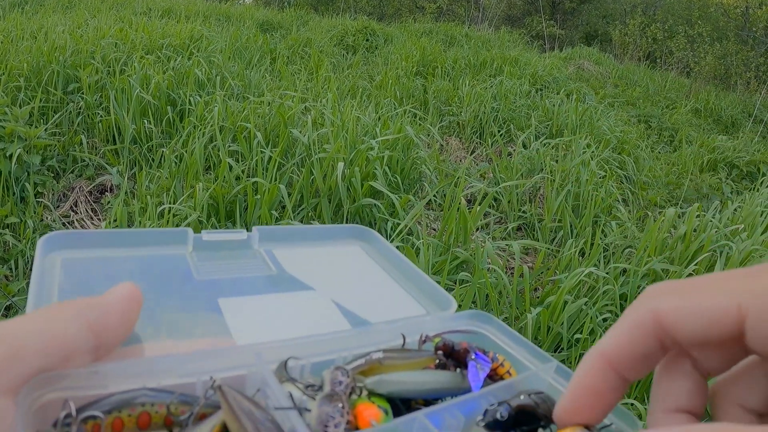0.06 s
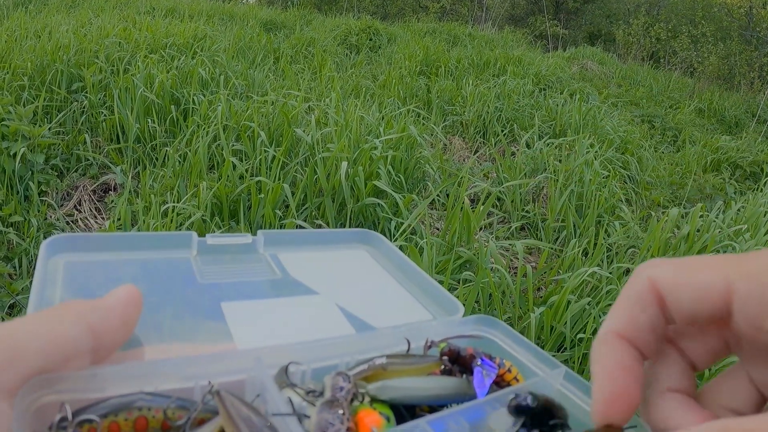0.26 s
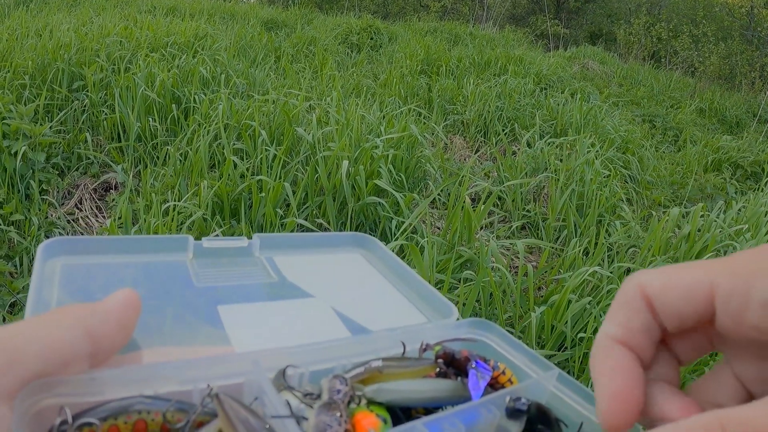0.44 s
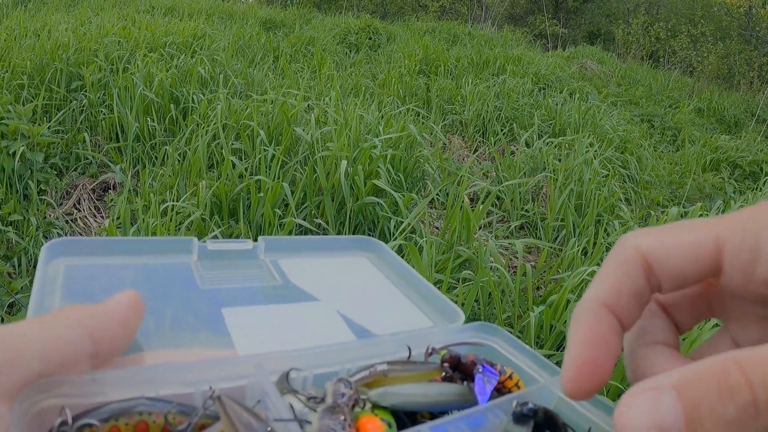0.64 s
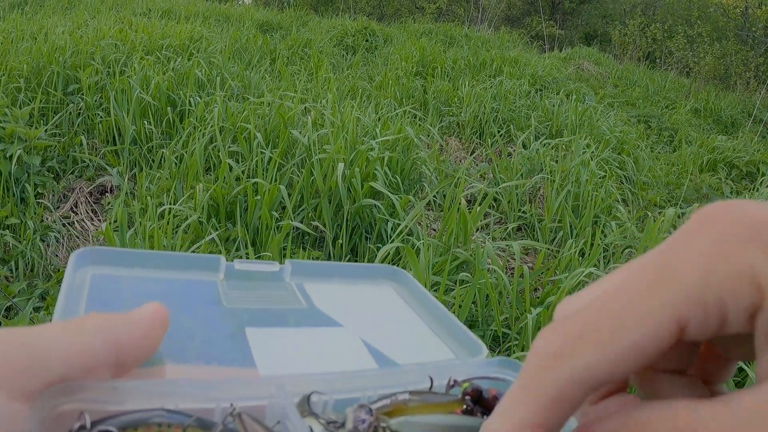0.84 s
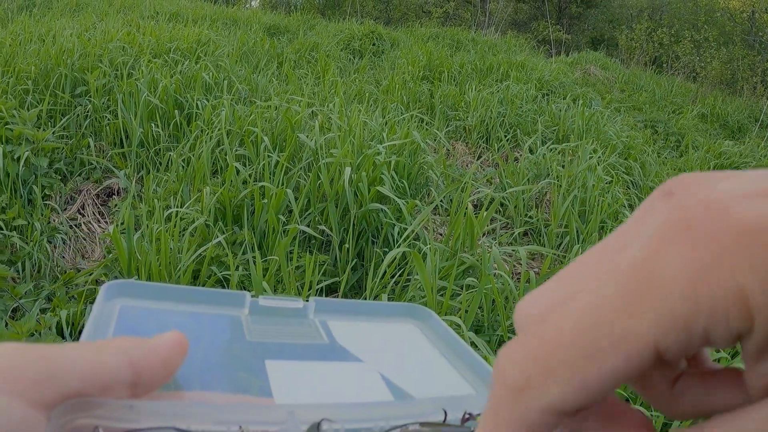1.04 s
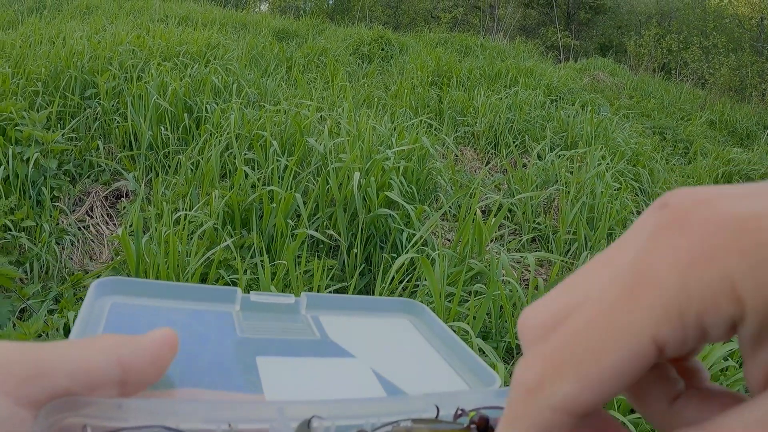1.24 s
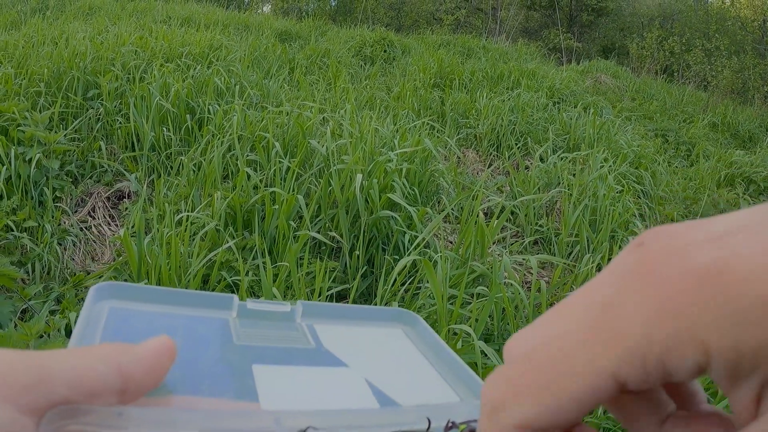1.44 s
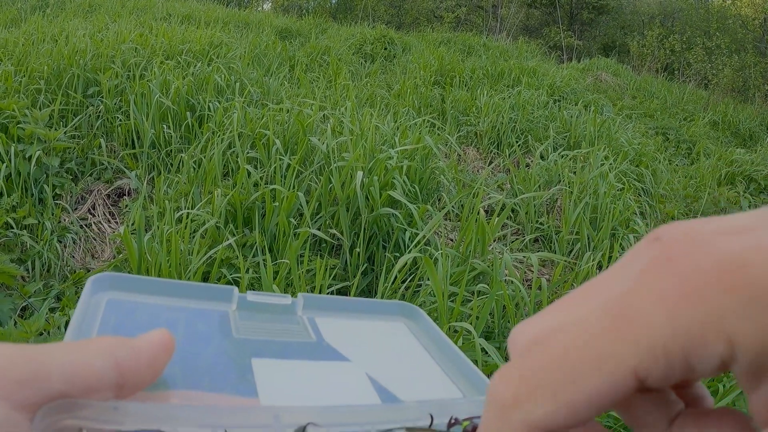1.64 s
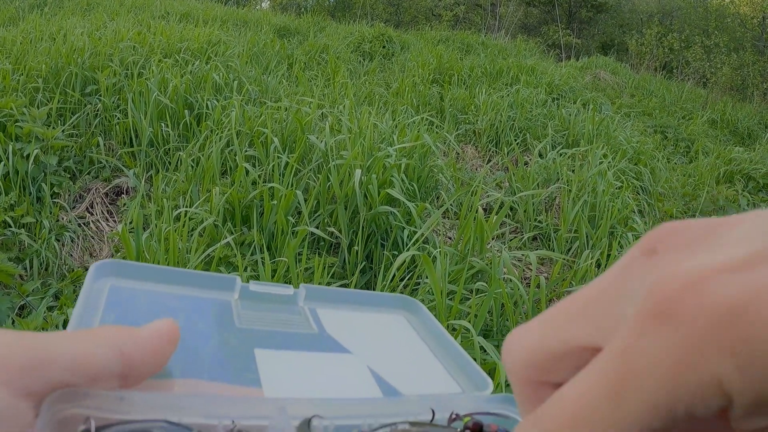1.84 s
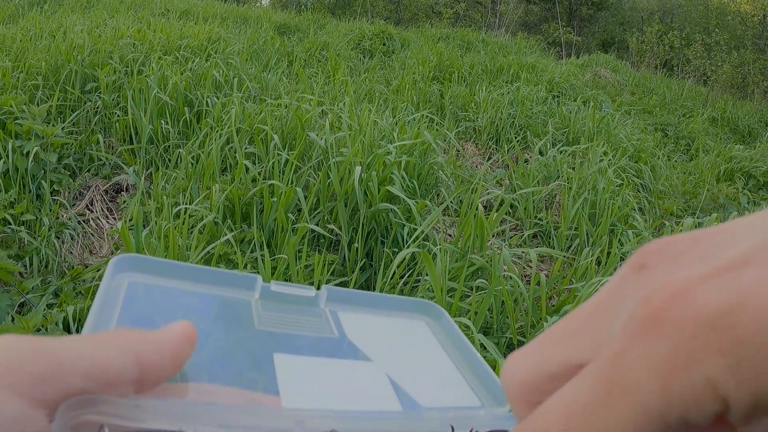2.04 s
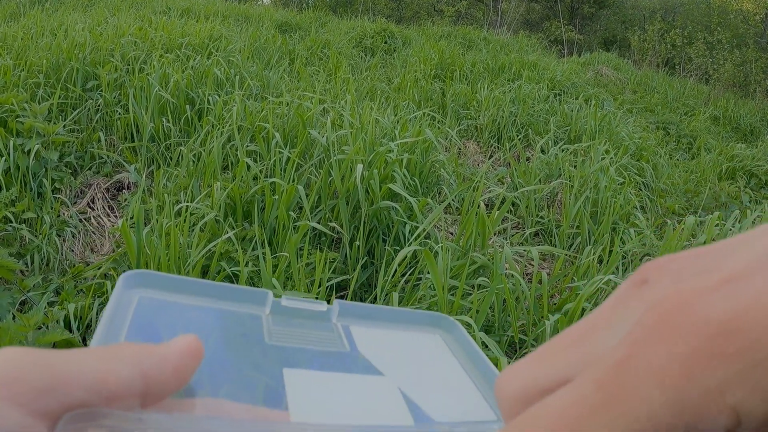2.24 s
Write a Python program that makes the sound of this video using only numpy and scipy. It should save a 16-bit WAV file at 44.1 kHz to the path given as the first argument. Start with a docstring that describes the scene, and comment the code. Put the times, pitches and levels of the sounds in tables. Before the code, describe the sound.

Hard plastic lures and small metal hooks rattle and click in a box stirred by hand

```python
"""Stirred tackle box in a meadow

Fingers stir hard lures and hooks in a plastic box close by: sharp clicks over a rattle of small ones.
Contacts are noise scrapes rung through resonances; sliding, thuds and rubbing are filtered noise.
Far birds are gliding tones; an insect-like buzz is gated noise; wind bumps are low sine bursts;
a faint outdoor hush is coloured noise."""
import sys
import numpy as np
from scipy import signal
from scipy.fft import rfft, irfft
from scipy.io import wavfile
from scipy.ndimage import map_coordinates

SR = 44100
rng = np.random.default_rng(int(sys.argv[2]) if len(sys.argv) > 2 else 0)


def master(y):
    """Save y as 16-bit WAV."""
    cut = np.clip(np.atleast_2d(y).T, -1, 1)
    pcm = np.round(cut * 32767)  # scale
    wavfile.write(sys.argv[1], SR, pcm.astype(np.int16))


def how_loud(loudness_db):
    """Turn decibels into a plain amplitude multiplier (0 dB gives 1, 20 dB gives 10)."""
    steps = np.asarray(loudness_db, float) / 20
    return 10 ** steps


N = 99225
T = np.arange(N) / SR

# How hard the fingers stir. Each row: time in seconds, rattle level in dB.
STIR_CURVE = [(0.0, -45.5), (0.066, -63), (0.078, -34.5), (0.108, -31), (0.122, -56.5), (0.2, -50.5),
              (0.257, -33.5), (0.309, -59.5), (0.39, -32.5), (0.416, -46), (0.434, -30.5), (0.509, -21.5),
              (0.552, -56.5), (0.915, -99), (0.935, -47.5), (1.063, -47), (1.183, -26), (1.213, -37),
              (1.235, -49), (1.28, -49), (1.306, -58), (1.403, -28), (1.425, -39.5), (1.474, -38.5),
              (1.51, -50.5), (1.613, -28), (1.64, -59.5), (1.66, -34), (1.707, -45), (1.732, -25.5),
              (1.839, -43), (1.9, -27), (1.935, -36), (1.963, -27), (1.992, -45.5), (2.022, -33),
              (2.05, -59), (2.105, -35.5), (2.176, -52), (2.25, -35.5)]
# Resonances of box and lures: middle, treble, hollow.
# Each row: centre in Hz, width in Hz, relative level in dB of one pass.
RING_MODES = [(2350, 357, 9.5), (3500, 1360, 0.5)]
TREBLE_MODES = [(5120, 1450, 11.5), (7990, 2860, 1), (11120, 7600, -2.5)]
HOLLOW_MODES = [(870, 700, -1), (1655, 870, 18.5)]
HOLLOW_DB, COLOUR_SPREAD_DB = -9, 5.5


def unit(x):
    """Rows brought to rms 1."""
    return x / np.sqrt(np.mean(x ** 2, -1, keepdims=True) + 1e-20)


def resonances(modes, hz, scatter_db=np.zeros(4)):
    """Causal response of summed second-order resonances of alternating sign, levels shifted by scatter_db."""
    total = 0
    for k, (centre_hz, width_hz, db) in enumerate(modes):
        damping = 1j * hz * width_hz
        response = damping / (centre_hz * centre_hz - hz * hz + damping)
        total = total + (-1) ** k * how_loud(db + scatter_db[k]) * response
    return total


def window(start_s, length_s):
    """A soft-edged gate."""
    return np.sin(np.pi * np.clip((T - start_s) / length_s, 0, 1)) ** .5


def shaped(gain, channels):
    """Noise of rms 1 coloured by gain(Hz)."""
    hz = np.fft.rfftfreq(N, 1 / SR) + 1
    return unit(irfft(rfft(rng.standard_normal((channels, N))) * gain(hz), N))


def drift(points_per_s):
    """Smooth random curve through normal points at a steady rate."""
    return map_coordinates(rng.standard_normal(N // 100), [T * points_per_s])


def smear(x, t60_s):
    """Decaying-noise reverberation, two channels of about the energy of x."""
    tail = rng.standard_normal((2, SR // 8)) * how_loud(-60 * T[:SR // 8] / t60_s)
    return signal.fftconvolve(x[None], tail / np.linalg.norm(tail[0]), axes=1)[:, :N]


def lean_right(pair):
    """Right channel raised 3 dB against the left."""
    return pair * how_loud([[-1.5], [1.5]])


def stir_db(s):
    """Stirring level at the times s, linear in dB between points."""
    return np.interp(s, *np.transpose(STIR_CURVE))


def strikes(rows, size=1024):
    """Each contact is a short scrape ringing three parts of the box in its own colour; mid and side."""
    contact_s, contact_spread, detune = .0005, .3, .03  # spreads are of the natural log
    s, peak_db, treble_db = np.transpose(rows)[:, :, None]
    luck = rng.standard_normal((len(rows), 2 * size + 7))
    u = np.arange(size) / SR / (contact_s * np.exp(contact_spread * luck[:, :1]))
    noise = luck[:, 7:].reshape(-1, 2, size).swapaxes(0, 1)
    spectrum = rfft(noise * u * np.exp(-u))
    hz = (np.fft.rfftfreq(size, 1 / SR) + 1) * np.exp(detune * luck[:, 1:2])
    colour_db = COLOUR_SPREAD_DB * np.tanh(luck[:, 2:7].T[:, :, None])

    def part(modes, scatter_db):
        """The scrape passed twice through one set of resonances, at rms 1."""
        return unit(irfft(spectrum * resonances(modes, hz, scatter_db) ** 2, size))

    ring = part(RING_MODES, colour_db[3:] / 2)
    treble = how_loud(treble_db) * part(TREBLE_MODES, colour_db)
    hollow = how_loud(HOLLOW_DB + colour_db[-1]) * part(HOLLOW_MODES, colour_db[2:])
    sound = ring + treble + hollow
    sound = sound * how_loud(peak_db) / np.abs(sound).max(-1, keepdims=True)
    at = (np.round(s * SR).astype(int) + np.arange(size)).ravel()
    return np.array([np.bincount(at, c.ravel(), N + size)[:N] for c in sound])


def clicks():
    """Plastic lure bodies knock the box, steel hooks and rings tick with more treble; mid and side."""
    knock_treble_db, tick_treble_db = -14.5, -5  # over the ring
    # Lure bodies on the box. Each row: start in seconds, peak in dB.
    knocks = [(0.0727, -25.5), (0.097, -24.5), (0.1781, -31), (0.2173, -18.5), (0.248, -21.5),
              (0.2598, -12), (0.29, -34), (0.393, -28), (0.44, -20), (0.4446, -15), (0.4635, -12),
              (0.4751, -15), (0.4812, -12), (0.4871, -13), (0.4947, -12.5), (0.5076, -22), (0.9305, -32.5),
              (1.034, -27.5), (1.077, -23), (1.0871, -28), (1.1356, -46), (1.1574, -20), (1.179, -12.5),
              (1.204, -25), (1.3476, -26.5), (1.3634, -19.5), (1.3818, -29), (1.405, -24), (1.411, -22.5),
              (1.4345, -20), (1.471, -27), (1.498, -30), (1.56, -20.5), (1.5728, -8), (1.577, -21.5),
              (1.6084, -19), (1.615, -25), (1.634, -31.5), (1.6494, -35), (1.663, -13.5), (1.7196, -15.5),
              (1.7261, -11.5), (1.761, -28), (1.8066, -21.5), (1.8835, -12.5), (1.9183, -16),
              (1.9561, -9.5), (2.1962, -32), (2.2459, -25)]
    # Hooks and rings. Each row: start in seconds, peak in dB.
    ticks = [(0.3842, -21.5), (0.4237, -11.5), (0.427, -11.5), (0.4377, -9), (0.4999, -8.5), (0.5154, -17),
             (0.538, -27), (0.9732, -27), (1.117, -47), (1.1887, -20.5), (1.393, -13.5), (1.3958, -12.5),
             (1.4758, -20.5), (1.6581, -12), (1.6902, -12.5), (1.7372, -18.5), (1.742, -15), (1.7462, -13),
             (1.7977, -21.5), (1.8935, -8.5), (1.899, -11.5), (1.9021, -12), (1.9693, -18.5),
             (2.0933, -26.5), (2.1155, -23.5), (2.2139, -28.5), (2.2346, -26)]
    rows = [(*row, knock_treble_db) for row in knocks]
    rows += [(*row, tick_treble_db) for row in ticks]
    return strikes(rows)


def rattle(count=1000):
    """Small contacts at random times, sized by the stirring, more of them faint than strong; mid and side."""
    size_range_db, treble_db = 16, -11
    s, size, colour = rng.uniform(size=(count, 3)).T
    s = s * N / SR
    peak_db = stir_db(s) + size_range_db * (size ** 2 - .5)
    return strikes(np.transpose([s, peak_db, treble_db + 3 * COLOUR_SPREAD_DB * (colour - .5)]))


def scrape():
    """Lures sliding on plastic: flickering noise in the same resonances; mid and side."""
    below_rattle_db, treble_db, flicker_db, flicker_per_s = -14, -3, 7, 180
    low = shaped(lambda hz: resonances(RING_MODES, hz) ** 2
                 + how_loud(HOLLOW_DB) * resonances(HOLLOW_MODES, hz), channels=2)
    high = shaped(lambda hz: resonances(TREBLE_MODES, hz), channels=2)
    low = low * how_loud(flicker_db * drift(flicker_per_s))
    high = high * how_loud(treble_db + flicker_db * drift(flicker_per_s / 2))
    return how_loud(stir_db(T) + below_rattle_db) * (low + high)


def thuds():
    """Box knocked on the lap and rubbed by hands: noise through the resonances of its body."""
    t60_s = .08
    rub_db, rub_follows = -35, 0.69  # level at 0 dB stirring, dB per dB of stirring
    # Knocks on the lap. Each row: start in seconds, initial level in dB.
    lap_knocks = [(0.436, -46), (0.499, -31.5), (1.393, -48), (1.726, -47.5), (1.914, -44.5)]
    # The whole box. Each row: centre in Hz, width in Hz, relative level in dB of one pass.
    body_modes = [(163, 103, 2.5), (353, 705, -1.5)]
    knocking = sum(how_loud(db - 60 * np.maximum(T - s, 0) / t60_s) * (T > s) for s, db in lap_knocks)
    rub = how_loud(rub_db + rub_follows * stir_db(T))
    return (knocking + rub) * shaped(lambda hz: resonances(body_modes, hz) ** 2, channels=1)


def box():
    """All box sounds, a little to the right; lid and body throw a short echo, treble is wider in stereo."""
    apart_db, echo_db, echo_t60_s = -12, -16, .05
    mid, side = clicks() + rattle() + scrape()
    side = np.diff(side, prepend=0)  # tilts the difference to the treble
    spread = how_loud(apart_db) * np.array([side, -side])
    return lean_right(mid + thuds() + spread + how_loud(echo_db) * smear(mid, echo_t60_s))


def birds():
    """Unsteady gliding whistles, a warble and a repeated high chip, blurred by the bushes."""
    flutter_db, waver_share, blur_t60_s = 3, .012, .07
    warble_s, warble_length_s, warble_db = .818, .052, -54
    warble_hz, warble_swing_hz, warble_per_s = 3350, 450, 72
    chip_s, chip_every_s, chip_length_s, chip_hz, chip_db = .664, .188, .012, 6620, -66
    # Whistles. Each row: start in seconds, length in seconds, first Hz, last Hz, level in dB.
    notes = [(0.055, 0.036, 2524, 2463, -48), (0.646, 0.027, 2640, 3500, -58),
             (0.691, 0.047, 3450, 2060, -70.5), (.868, 0.0072, 3240, 3750, -49),
             (0.875, 0.081, 3666, 3560, -55), (0.928, 0.125, 3430, 3150, -57)]
    waver = 1 + waver_share * drift(40)
    flutter = how_loud(flutter_db * drift(70))

    def tone(hz):
        """Sine following hz, with the shared waver and flutter."""
        return flutter * np.sqrt(2) * np.sin(2 * np.pi * np.cumsum(hz * waver) / SR)

    song = sum(how_loud(db) * window(s, d) * tone(np.interp(T, [s, s + d], [first_hz, last_hz]))
               for s, d, first_hz, last_hz, db in notes)
    swing = np.sin(2 * np.pi * warble_per_s * (T - warble_s))
    warble = (1 - np.abs(swing) / 2) * tone(warble_hz + warble_swing_hz * swing)
    song = song + how_loud(warble_db) * window(warble_s, warble_length_s) * warble
    chips = sum(window(chip_s + k * chip_every_s, chip_length_s) for k in range(3))
    song = song + how_loud(chip_db) * chips * tone(np.full(N, chip_hz))
    return (song + smear(song, blur_t60_s)) / np.sqrt(2)


def buzz():
    """A band of rasping noise switched on and off at a steady pace."""
    peak_s, every_s, on_share = .653, .0628, .45
    centre_hz, width_hz, level_db = 5450, 700, -69
    cycle = np.cos(2 * np.pi * (T - peak_s) / every_s)
    gate = np.clip(3 * (cycle - np.cos(np.pi * on_share)), 0, 1)
    rasp = shaped(lambda hz: np.exp(-((hz - centre_hz) / width_hz) ** 2), channels=1)
    return how_loud(level_db) * gate * rasp


def wind():
    """Slow pushes on the microphone: short swells of a low sine."""
    bump_hz = 28.7
    # Wind bumps. Each row: start in seconds, length in seconds, level in dB.
    bumps = [(0.717, 0.076, -60.5), (0.834, 0.07, -54), (0.977, 0.055, -52.5), (1.75, 0.0092, -48.5),
             (1.898, 0.047, -47)]
    push = sum(how_loud(db) * window(s, d) ** 4 * np.sqrt(2) * np.sin(2 * np.pi * bump_hz * (T - s))
               for s, d, db in bumps)
    return lean_right(push)


def hush():
    """Steady far noise of meadow and water, partly different left and right."""
    level_db, apart_db = -65.5, -5
    # Hush spectrum. Each row: frequency in Hz, relative density in dB per Hz.
    spectrum = [(30, -1.5), (90, -12.5), (170, -2.5), (600, -20), (2100, -17.5), (3400, -8), (4500, -21.5),
                (6500, -16.5), (8500, -35), (16000, -53)]
    f, db = np.transpose(spectrum)
    mid, side = shaped(lambda hz: how_loud(np.interp(np.log(hz), np.log(f), db)), channels=2)
    return how_loud(level_db) * (mid + how_loud(apart_db) * np.array([side, -side]))


def scene():
    """All sources."""
    return box() + birds() + buzz() + wind() + hush()


def roll_off(x):
    """The treble ends steeply here."""
    return signal.sosfilt(signal.butter(12, 16460, fs=SR, output="sos"), x)


def record(dry):
    """The microphone rolls off the top above 12.5 kHz."""
    dull = signal.sosfilt(signal.butter(N=6, Wn=12500, fs=SR, output="sos"), dry)
    return roll_off(dull)


dry = scene()
out = record(dry)
master(out)
```